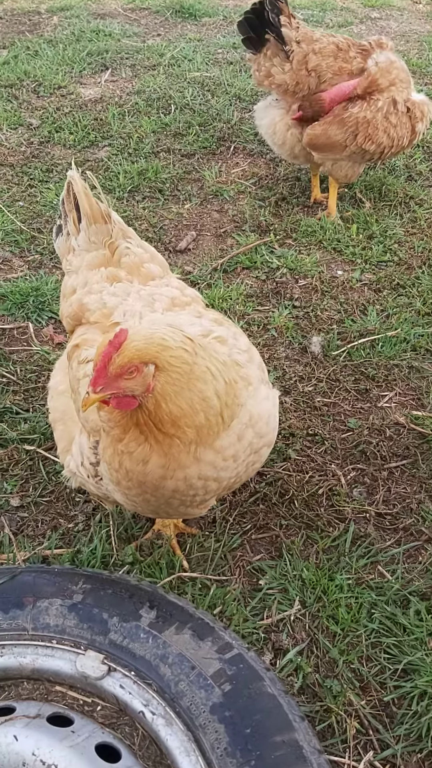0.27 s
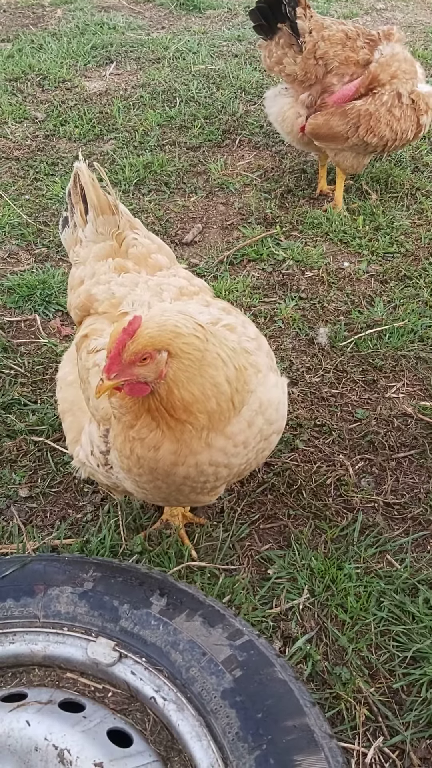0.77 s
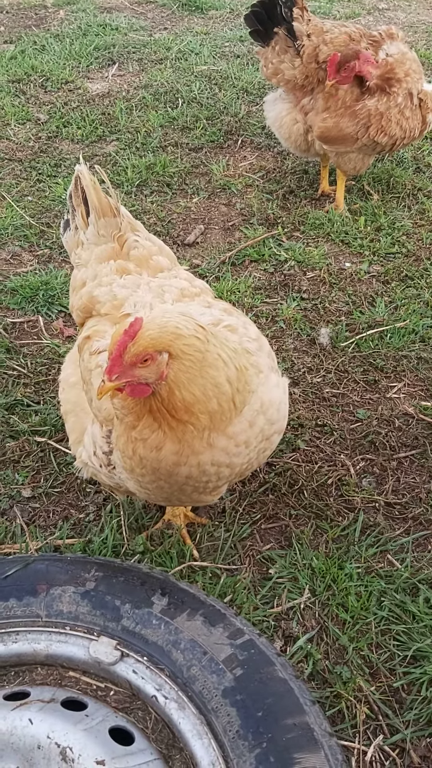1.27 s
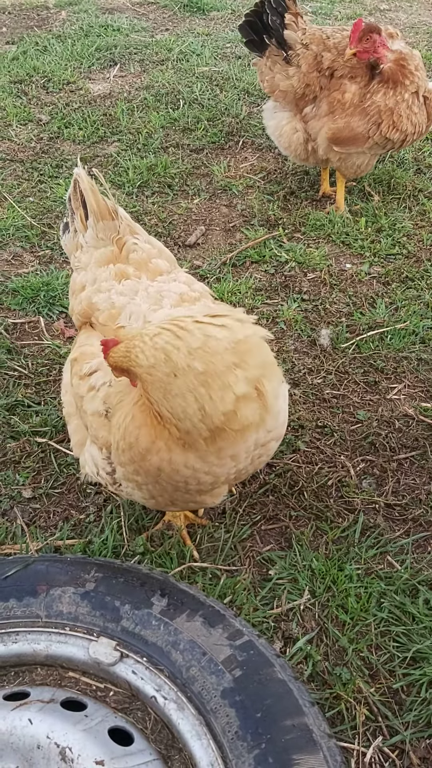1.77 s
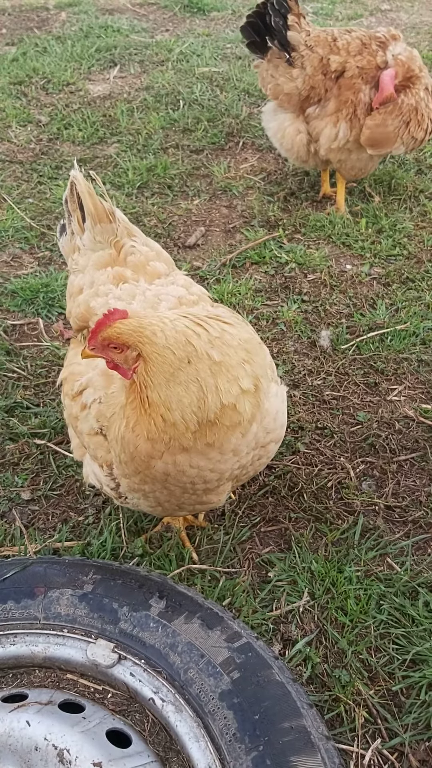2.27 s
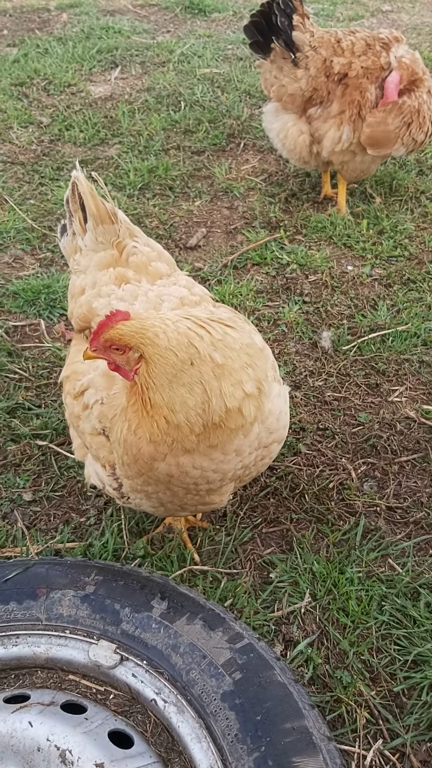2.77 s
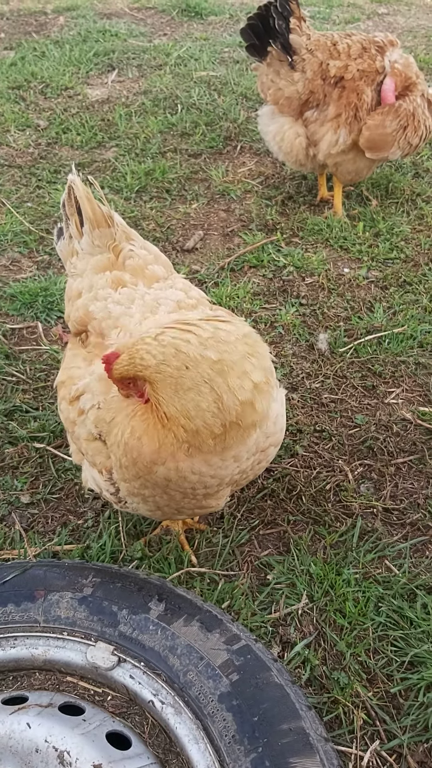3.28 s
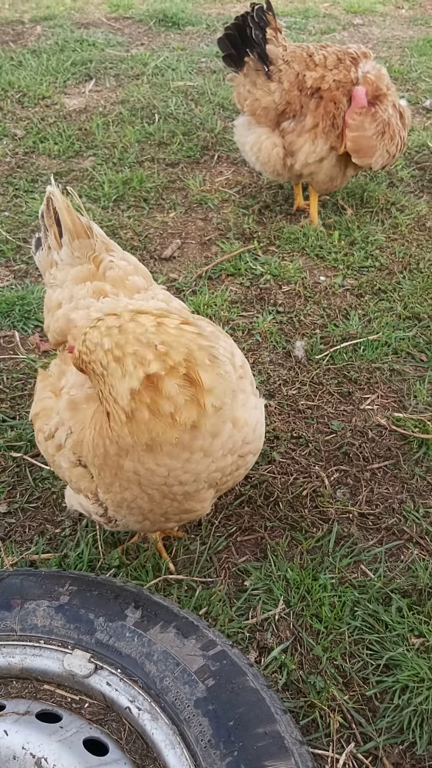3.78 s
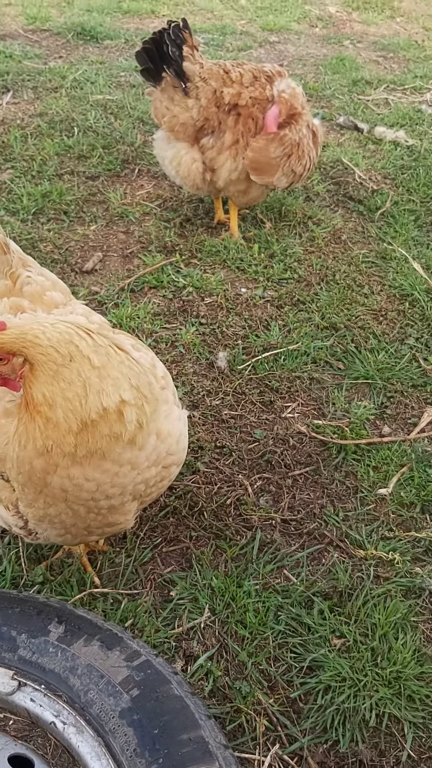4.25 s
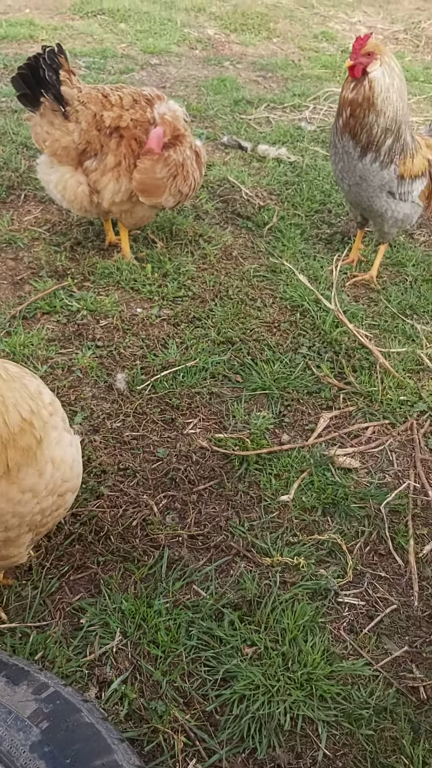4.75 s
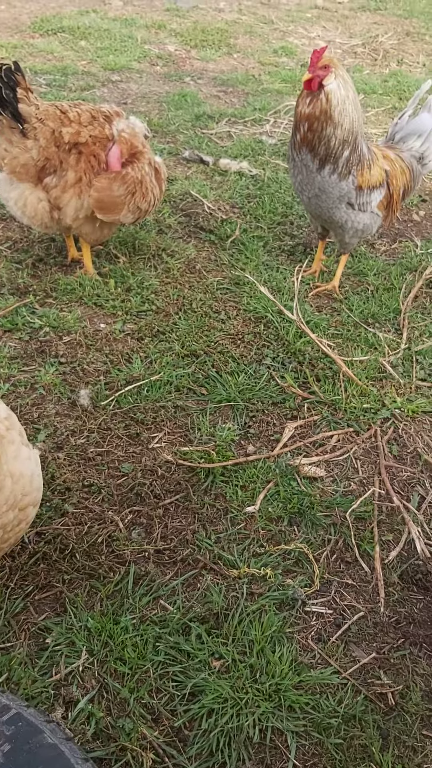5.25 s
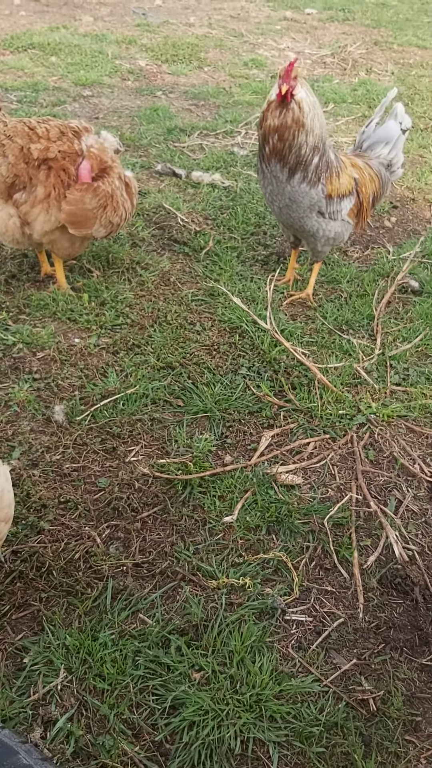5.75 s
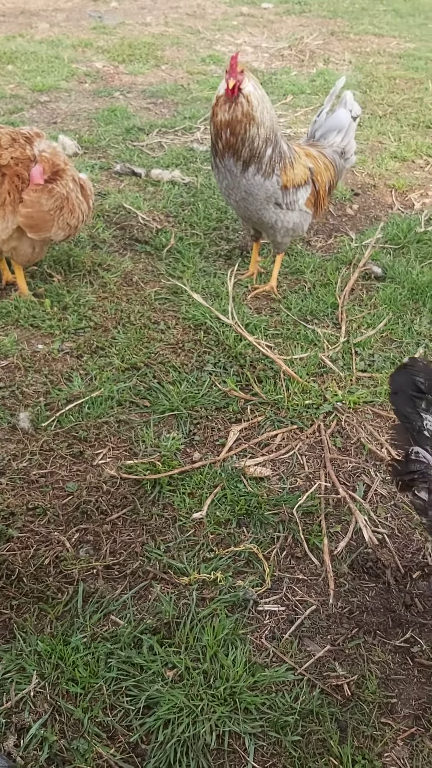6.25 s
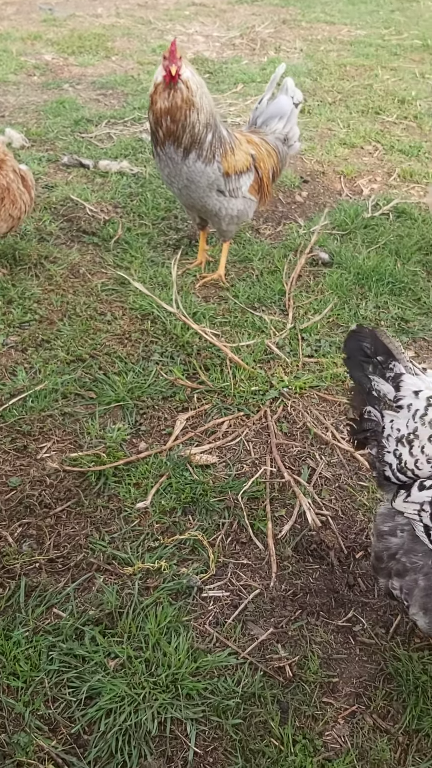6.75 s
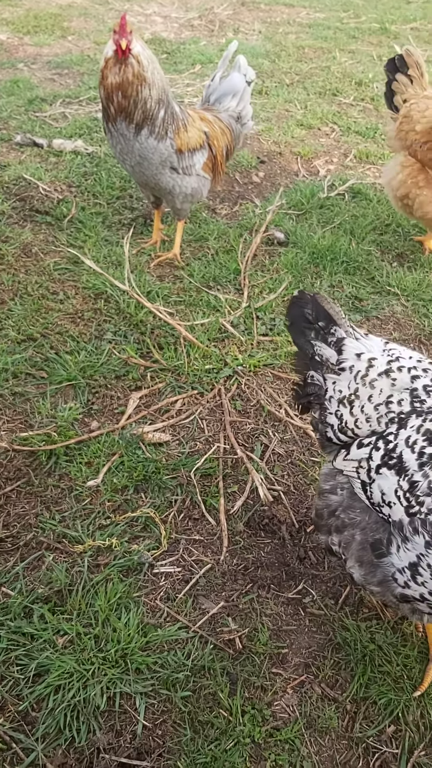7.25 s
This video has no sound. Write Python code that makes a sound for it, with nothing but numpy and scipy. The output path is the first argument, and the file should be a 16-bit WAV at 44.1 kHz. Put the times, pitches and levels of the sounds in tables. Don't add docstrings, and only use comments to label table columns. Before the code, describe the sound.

A close hen gives two quavering, even-pitched calls in an open field, the second introduced by a low growl and a brief crack. Small birds whistle faintly far away between them, and low wind flutters. Afterwards there is no more calling, only hissing finger strokes, crisp ticks and hollow pops against a handheld stereo microphone, strongest at the right, with a few tiny squeaks.

```python
import sys
import numpy as np
from scipy import signal
from scipy.io import wavfile
from scipy.ndimage import uniform_filter1d

SR = 44100
rng = np.random.default_rng(int(sys.argv[2]) if len(sys.argv) > 2 else 0)


def to_wav(s):
    ch = np.atleast_2d(s).T
    pcm = np.round(np.clip(ch, -1, 1) * 32767)
    wavfile.write(sys.argv[1], SR, pcm.astype(np.int16))


def invert_db(level):
    return 10 ** (np.asarray(level, dtype=float) / 20)


N = 331632

# start_s, peak_s, start_db, peak_db, pitch_hz
FIRST_CALL = [(0.0, 0.026, -45.5, -38, 448.5), (0.046, 0.068, -39.5, -37, 454.5),
              (0.096, 0.116, -38, -38.5, 447), (0.142, 0.17, -40.5, -42.5, 613.4),
              (0.187, 0.198, -40, -36, 465), (0.208, 0.223, -39, -35.5, 458),
              (0.235, 0.263, -38, -36.5, 448.7), (0.286, 0.301, -39, -34, 465.4),
              (0.321, 0.345, -39, -35.5, 475.5), (0.365, 0.382, -37, -34, 448.5),
              (0.396, 0.419, -39.5, -32, 457), (0.439, 0.47, -41, -32, 458.5),
              (0.493, 0.527, -39.5, -33.5, 448.2), (0.553, 0.567, -38, -35, 436.7),
              (0.596, 0.614, -52, -80, 429)]
# start_s, peak_s, start_db, peak_db, pitch_hz
GROWL = [
    (2.33, 2.346, -62, -60.5, 443.5),
    (2.392, 2.412, -80, -48, 451.4),
    (2.445, 2.495, -87, -46, 465.7),
    (2.535, 2.568, -56, -42.5, 473),
    (2.612, 2.652, -58.5, -44, 478.5),
    (2.69, 2.71, -51, -48, 530),
    (2.727, 2.748, -47, -45.5, 557.3),
    (2.762, 2.775, -56, -42, 497),
    (2.79, 2.8, -55, -46, 491),
]
# start_s, peak_s, start_db, peak_db, pitch_hz
RISE = [
    (2.818, 2.82, -50, -39, 464),
    (2.84, 2.82, -44, -37, 492),
    (2.858, 2.83, -47, -39, 460),
    (2.9, 2.91, -40, -36, 479),
    (2.91, 2.92, -41.5, -38, 455),
    (2.944, 2.97, -41, -36.5, 467),
    (2.978, 2.989, -51, -37.5, 471),
    (2.991, 2.985, -47.5, -38, 443.6),
    (3.015, 3.025, -44, -31, 462),
]
# start_s, peak_s, start_db, peak_db, pitch_hz
CATCH = [
    (3.04, 3.052, -49, -70, 455.6),
    (3.058, 3.07, -79.5, -67.5, 760),
    (3.076, 3.081, -61, -53, 725),
    (3.091, 3.097, -52, -50, 674.7),
    (3.102, 3.108, -51, -50.5, 635.4),
]
# start_s, peak_s, start_db, peak_db, pitch_hz
LONG_CALL = [(3.117, 3.144, -44, -31.5, 473.2), (3.188, 3.196, -39.5, -30.0, 482.7),
             (3.216, 3.257, -45, -29.5, 474.5), (3.283, 3.306, -53, -29, 481.6),
             (3.333, 3.349, -32, -31, 474), (3.388, 3.419, -39, -30.5, 459.6),
             (3.448, 3.471, -42, -29, 466.7), (3.499, 3.529, -37, -28.5, 470.8),
             (3.561, 3.567, -37.5, -36, 467), (3.572, 3.596, -39, -28, 465),
             (3.606, 3.644, -37, -26.5, 470), (3.662, 3.68, -37.5, -28.5, 476),
             (3.719, 3.738, -41, -26, 468), (3.764, 3.811, -52, -29.0, 459.6),
             (3.834, 3.851, -37.5, -31.5, 472), (3.865, 3.881, -45, -30.5, 467.4),
             (3.891, 3.919, -35.5, -26.5, 469), (3.938, 3.954, -35, -28, 470.2),
             (3.963, 3.984, -33.5, -29.5, 460.8), (4.004, 4.015, -39.5, -31, 453.7),
             (4.025, 4.041, -37.5, -32.5, 440), (4.048, 4.063, -37, -29.5, 460.5),
             (4.091, 4.12, -44, -27.5, 469.5), (4.122, 4.13, -35, -33.5, 468.6),
             (4.139, 4.175, -58.5, -34, 473.3), (4.173, 4.202, -45.5, -34.5, 469.4),
             (4.212, 4.221, -35, -28, 473.8), (4.242, 4.279, -69, -38.0, 470),
             (4.287, 4.314, -70.0, -99, 468)]
# time_s, half_pitch_db, brightness_db_per_octave
FIRST_VOICE = [
    (0, -30, 10),
    (.135, -11.5, 5.5),
    (0.147, 4, -2),
    (.18, 7, 24),
    (.195, -8.5, 8),
    (0.301, -21, 3.5),
    (.47, -34, 5),
]
# time_s, half_pitch_db, brightness_db_per_octave
GROWL_VOICE = [
    (2.3, 1, 3.5),
    (2.75, -2.5, 21),
    (2.79, -6.5, -8),
    (2.86, -9, -4),
    (2.99, -27.5, -4),
    (3.03, -8, 4),
    (3.11, 9.5, 4),
]
# time_s, half_pitch_db, brightness_db_per_octave
LONG_VOICE = [
    (3.13, -12, -4.5),
    (3.349, -42.5, -8.5),
    (3.42, -12.5, -0.5),
    (3.54, -14, -0.5),
    (3.62, -32, -5.5),
    (3.76, -46, -6.5),
    (3.81, -13.5, 0),
    (3.95, -26, -9.5),
    (4.2, -13.5, 1),
]
# time_s, level_db
RASP = [
    (3.38, -11),
    (3.42, -1.5),
    (3.47, 4),
    (3.54, 4),
    (3.6, 2.5),
    (3.64, -8),
    (4.18, -13),
    (4.22, -3),
]
# time_s, shift_hz
FLICKS = [(0.007, 14), (0.021, 14.5), (0.049, 14), (0.06, 35.5), (0.08, -21.5), (0.096, -14),
          (0.116, -20.5), (0.122, 30.5), (0.127, -9.5), (0.212, 19.5), (0.23, -14), (0.234, 27.5),
          (0.252, 14), (0.268, 10), (0.279, -17.5), (0.294, 18), (0.315, -25), (0.322, 55),
          (0.334, -24), (0.339, 34.5), (0.351, -22.5), (0.373, 35.5), (0.414, 23.5), (0.436, -26.5),
          (0.44, 53), (0.46, 17), (0.474, 11.5), (0.484, -36), (0.499, 18), (0.53, 28.5),
          (0.567, 24.5), (0.578, -30),
          (2.862, 33), (2.877, 10.5), (2.914, -14), (2.928, 18), (2.948, 21.5), (2.962, -33.5),
               (2.981, 27), (3.013, -19.5), (3.029, -23.5), (3.155, -11.5), (3.174, 22.5), (3.2, 17.5),
               (3.209, -26), (3.224, 48), (3.243, -13), (3.253, 11), (3.265, -26.5), (3.314, -20.5),
               (3.323, -12.5), (3.36, -26), (3.365, 24), (3.402, -23.5), (3.418, -12), (3.438, 42.5),
               (3.452, 28.5), (3.468, -21), (3.507, 15.5), (3.562, 18), (3.569, -28.5), (3.587, 22.5),
               (3.604, -30.5), (3.657, -16.5), (3.673, 29), (3.684, -21.5), (3.723, -19.5), (3.73, 18.5),
               (3.757, -33.5), (3.789, -26), (3.838, 19.5), (3.849, 18.5), (3.877, 13.5), (3.895, 17),
               (3.946, 16), (3.978, -12), (3.984, 21), (4.004, -26.5), (4.012, 10.5), (4.063, 20),
               (4.094, -43), (4.112, 18.5), (4.126, -45.5), (4.133, 26.5), (4.161, -36), (4.167, 32),
               (4.182, -58), (4.229, -18.5), (4.271, -17)]
# freq_hz, gain_db
THROAT = [(200, -8.5), (460, 1), (700, -6), (930, -9), (1160, 0), (1400, -15), (1850, -29.5), (2100, -51.5),
          (2350, -26), (2800, -47), (3500, -36), (4200, -43), (4800, -61.5)]
# freq_hz, gain_db
HEAD_TURNED = [(460, 0), (930, 4), (1400, -7), (1850, 1), (2200, 0), (4000, -8)]
# freq_hz, left_minus_right_db
HEN_BALANCE = [(60, -2.5), (180, -5), (550, 0), (1650, -7.5), (4970, 4.5), (15000, -9)]

# time_s, crack_db
TICKS = [(0.462, -51.5), (2.36, -64), (4.784, -43), (4.8154, -45), (4.474, -49), (5.38, -52.5),
         (5.4257, -56), (5.703, -38.5), (5.764, -52), (5.878, -34), (5.7948, -21), (6.3948, -19.5),
         (6.396, -21), (6.398, -32), (6.5276, -41), (6.6746, -45), (6.9623, -43)]
# time_s, crack_db, thump_db
POPS = [(4.294, -46, -42), (4.4112, -52, -41), (6.038, -40, -41), (4.746, -72, -39), (4.872, -55, -37),
        (4.904, -57, -41), (5.654, -53, -34), (5.8204, -32, -28), (5.841, -43, -59), (6.1094, -39.5, -34),
        (6.1405, -41.5, -28), (6.157, -38, -26.5), (6.1647, -36.5, -27), (6.1942, -28.5, -26.5),
        (6.1976, -31.5, -32), (6.1989, -42.5, -24.5), (6.222, -32, -28), (6.229, -33, -24.5),
        (6.405, -40, -37), (6.432, -34.5, -36), (6.7579, -41, -34.5), (6.896, -38.5, -34),
        (6.8984, -41, -38), (6.9065, -25.5, -21), (6.919, -42, -38), (6.926, -29.5, -24.5),
        (6.9371, -38.5, -34), (6.9489, -26.5, -23.5), (7.0157, -42, -40), (7.2563, -32.5, -27.5)]
# time_s, crack_db, thump_db, tear_lead_s
TEARS = [
    (6.2522, -21, -26, 0.0024),
    (6.4205, -28.5, -23.5, 0.00414),
    (6.5333, -20.5, -25.5, 0.00295),
    (6.6051, -22, -21, .0023),
    (6.638, -23.5, -23, 0.0033),
    (6.659, -29, -23.5, 0.0042),
    (6.7175, -26, -22, .0055),
    (7.0487, -25, -22.5, 0.0027),
    (7.1005, -27, -22.5, .0041),
    (7.2979, -30, -22, 0.0051),
]
SOFT_PADS_S = [6.038, 6.1094, 6.1403, 6.4324, 6.7578, 7.0155]
# peak_s, rise_s, fall_s, hiss_db, bright_db, dull_db
STROKES = [(.08, 0.97, 0.34, -74, -9, 0.5), (.34, 1, 0.13, -72.5, -2.5, 5),
           (3.58, 0.64, 0.52, -80.5, 1, 2.5), (3.85, 0.16, 0.28, -67, -0.5, 3),
           (4.23, 0.05, 0.19, -61, -7.5, 1), (4.55, 0.2, 0.27, -57, -10, -1),
           (4.8, 0.152, 1, -82.5, -10, -5), (5.67, 0.044, 0.44, -60.5, -2, 2),
           (5.839, 0.071, 0.26, -50, -9.5, -1.5), (5.94, 0.11, 0.48, -55, -7, -3.5),
           (6.18, 1, 0.35, -76.5, 0, -3), (6.7, 0.58, 0.14, -70, -1, -0.5),
           (6.92, 0.031, 0.29, -68, -15, -1.5), (7.14, 0.25, 0.24, -74, 5.5, -5.5),
           (7.3, 0.043, 0.21, -58.5, -2.5, 0.5), (7.442, 0.041, 0.058, -51.5, -1, 0)]
# start_s, peak_s, end_s, level_db
LEFT_STROKES = [
    (3.58, 3.62, 3.66, -78),
    (3.6, 3.72, 3.84, -79),
    (3.72, 3.88, 4.0, -71),
    (4.18, 4.24, 4.33, -80),
    (5.8, 5.93, 6.12, -80),
]
# freq_hz, density_db_per_hz
SKIN = [(60, 22.5), (150, 0.5), (300, 6), (700, 2), (1600, -2.5), (3700, -5.5), (5800, -5), (8000, -21),
        (11000, -21.5), (16800, 4.5)]
LEFT_SKIN = [(3000, -12), (4500, 3.5), (6800, 0.5), (9000, -16), (13000, -11), (15800, -5)]
# peak_s, half_length_s, centre_hz, level_db, left_minus_right_db
HOLLOWS = [
    (.23, 0.21, 13000, -68, -14),
    (.2, 0.22, 4500, -68.5, -11),
    (0.032, 0.044, 4500, -71, -9),
    (3.85, .3, 13800, -76, -10),
    (5.94, .14, 3400, -51.5, -30),
    (6.8, 0.11, 4900, -74, -33),
    (7.203, .09, 5200, -74, -30),
    (7.451, 0.05, 5400, -60.5, -33),
    (7.51, .012, 5200, -66, -30),
]

# start_s, start_hz, level_db
WHISTLES = [(.872, 4280, -82), (1.012, 4200, -87), (1.66, 4940, -80), (1.765, 4900, -80),
            (1.905, 3560, -80), (2.02, 3600, -86), (2.178, 4880, -74), (2.295, 4870, -74.5),
            (2.415, 3610, -71.5), (2.53, 3620, -79), (2.672, 4947, -69.5), (2.695, 3600, -78),
            (2.785, 4920, -78.5), (6.675, 5050, -74), (6.79, 4930, -74), (6.54, 3580, -75),
            (7.185, 4900, -75), (6.775, 5000, -82)]
# start_s, length_s, start_hz, end_hz, level_db
SQUEAKS = [
    (.665, 0.095, 2890, 2640, -72),
    (3.2, 0.05, 3110, 2360, -73.5),
    (5.419, 0.012, 1480, 1270, -52.5),
    (6.452, 0.036, 1520, 1250, -55),
    (7.37, 0.072, 1560, 1710, -53.5),
    (7.42, 0.097, 1307, 1194, -61),
    (7.43, 0.062, 2100, 2230, -58),
]

# time_s, level_db
GUSTS = [(0, -53.5), (.3, -56.5), (.6, -49.5), (.85, -60), (1.1, -51), (1.7, -58), (2.2, -58.5), (2.9, -50),
         (3.5, -46), (3.8, -50), (4.55, -46), (4.85, -47.5), (5.3, -56), (5.6, -42.5), (6.1, -55),
         (6.5, -54.5), (7.2, -52.5), (7.51, -54)]
# peak_s, rise_s, fall_s, level_db
BUFFETS = [
    (.45, 2.7, 0.61, -42.5),
    (2.6, 1.2, 0.5, -45),
    (3.5, 0.53, 0.77, -42.5),
    (4.3, 0.98, 0.65, -53),
    (4.8, 0.66, 0.18, -43.5),
    (5.3, 0.42, 1, -37.5),
    (5.65, 0.53, 0.93, -46.5),
    (3.95, 0.11, 0.16, -40),
    (7.2, 0.39, 1, -52),
]
# freq_hz, density_db_per_hz
RUMBLE = [(15, -34), (25, -3), (59, -2.5), (95, -3.5), (119, -7.5), (180, -17.5), (230, -52.5), (400, -120)]
FLUTTER = [(100, -40.5), (170, -25), (270, 19.5), (376, -13), (421, 0.5), (700, -51), (910, -56.5),
           (1540, -120)]
# freq_hz, density_db_per_hz
AIR = [(260, -51.5), (450, -4), (646, -17.5), (1480, -5), (1940, -26), (4190, -26), (6100, -30.5),
       (8500, -31), (15100, -24), (16500, -36)]
# freq_hz, left_minus_right_db
AIR_BALANCE = [(60, -2.0), (240, -0.5), (950, -5.5), (3770, 7.5), (15000, -1.5)]
# freq_hz, share
LIKENESS = [(60, 1), (380, 0.69), (2380, 0.0008), (15000, 0.032)]

SAG_SHARE, SAG_FROM_DB = 0.0049, -45
BREAK_HZ = 500
FLICK_S, FLICK_SHARE = 0.0033, 1.1
ROUNDNESS = 1.5
ROUGH_LOUD, ROUGH_SOFT, ROUGH_PER_DB = .115, .165, .011
UNEVEN_FROM_DB, UNEVEN_ROUGH = -9, .005
UNEVEN_SECOND_DB, UNEVEN_TOP_DB = -0.57, -0.5
OPEN_FROM_DB, OPEN_PER_DB = -37, 1.3
BREATH_DB = -33
TICK_THUMP_DB = -3.5
TEAR_CRACK_DB, TEAR_THUMP_DB = -5, -13
BRIGHT_PER_DB = 0.32
PAD_SOFT, SNAP, SPARK_QUICK = 0.86, 1.1, 2.2
RESTING_DB, RESTING_BRIGHT_DB = -88, -84
DULL_PER_DB, DULL_DB = -0.0341, -1
HOLLOW_WIDTH = 0.14
HIGH_WHISTLE_S, LOW_WHISTLE_S = .078, .115
FIELD_T60_S, FIELD_DB = .6, -7
FLUTTER_FOLLOWS, FLUTTER_DB = 0.29, -56
RIGHT_LEAN = -0.37
AIR_DB = -74.5
LIMIT, LOW_CUT_HZ, TOP_CUT_HZ = .36, 38, 15900


def rms_one(x):
    return x / np.sqrt(np.mean(x ** 2) + 1e-20)


def in_time(rows):
    s, *columns = np.transpose(rows)
    return [np.interp(np.arange(N) / SR, s, c) for c in columns]


def at_hz(points, hz):
    freq_hz, db = np.transpose(points)
    return np.interp(np.log(hz), np.log(freq_hz), db)


def drift(rate, size=N):
    r = np.exp(-64 * np.pi * rate / SR)
    chance = rng.standard_normal(size // 32 + 1002)
    slow = signal.lfilter([1], [1, -2 * r, r * r], chance)[1000:]
    return np.interp(np.arange(size) / 32, np.arange(len(slow)), rms_one(slow))


def ring(x, hz, t60_s):
    r, w = invert_db(-60 / (t60_s * SR)), 2 * np.pi * hz / SR
    return signal.lfilter([np.sin(w)], [1, -2 * r * np.cos(w), r * r], x + 1e-18)


def pan(db):
    left = invert_db(db) / (1 + invert_db(db))
    return 2 * np.array([left, 1 - left])


def swells(rows, floor_db):
    t = np.arange(0, N, 64) / SR
    total = invert_db(floor_db)
    for s, rise, fall, db in rows:
        total = total + invert_db(db - 20 * np.where(t < s, (s - t) / rise, (t - s) / fall))
    return np.interp(np.arange(N) / SR, t, 20 * np.log10(total))


def banded_noise(spectrum, patchy_db, rate, alike, shaping):
    low_hz, high_hz = spectrum[0][0], spectrum[-1][0]
    edges = np.geomspace(low_hz, high_hz, round(2 * np.log2(high_hz / low_hz)) + 1)
    centres = np.sqrt(edges[1:] * edges[:-1])
    total = np.sqrt(np.sum(invert_db(2 * at_hz(spectrum, centres)) * np.diff(edges)) * 2 / SR)
    out, together, white = 0, drift(rate), rng.standard_normal((2, 2, N))
    for k, hz in enumerate(centres):
        band = signal.butter(2, edges[k:k + 2], "band", fs=SR, output="sos")
        mid, side = signal.sosfilt(band, white[k % 2])
        share = np.clip(alike * at_hz(LIKENESS, hz), 0, .99)
        flicker_db = patchy_db * (together + 0.71 * drift(rate))
        gain = invert_db(at_hz(spectrum, hz) + flicker_db) / total
        stereo = np.sqrt(1 + share) * mid + np.sqrt(1 - share) * side * [[1], [-1]]
        out = out + gain * shaping(hz) * stereo / np.sqrt(1 + share)
    return out


def hen(throbs, voice, turned):
    start, peak, start_db, peak_db, mean_hz = np.transpose(throbs)
    first, last = round(start[0] * SR), round(peak[-1] * SR)
    t = np.arange(first, last) / SR
    level_db = breath_db(t, start, peak, start_db, peak_db)
    sag = SAG_SHARE * np.clip((peak_db - SAG_FROM_DB) / 10, 0, 1) * (mean_hz < BREAK_HZ)
    pitch = pitch_of(t, start, peak, mean_hz * (1 + sag), mean_hz * (1 - sag)) + flicks(t)

    half_db, bright = [c[first:last] for c in in_time(voice)]
    rasp_db = in_time(RASP)[0][first:last]
    uneven = np.clip(half_db - UNEVEN_FROM_DB, 0, 10)
    rough = ROUGH_LOUD - ROUGH_PER_DB * (level_db - level_db.max() + 7)
    rough = np.clip(rough, ROUGH_LOUD, ROUGH_SOFT) + UNEVEN_ROUGH * uneven
    jitter = 1 + rough * 0.15 * drift(70, size=len(t))
    phase = np.pi * np.cumsum(pitch * jitter) / SR
    push_db = np.clip(1.7 * (level_db + 33), -14, 7)

    out = np.zeros((2, N))
    for k in range(1, 21):
        hz = k * pitch / 2
        octaves = np.log2(max(k / 4, 1))
        db = level_db + 0.5 + at_hz(THROAT, hz) + turned * at_hz(HEAD_TURNED, hz)
        db += push_db * octaves ** .5 + bright * octaves + half_db * (k % 2)
        db += (k > 7) * np.clip(OPEN_PER_DB * (level_db - OPEN_FROM_DB), -16, 0) + (k > 11) * rasp_db
        db += uneven * ((k == 4) * UNEVEN_SECOND_DB + (k > 6) * UNEVEN_TOP_DB)
        shimmer = 1 + rough * min(.75 * k - .6, 5 + 3 * (k > 11)) * drift(130, size=len(t))
        lag = -.03 * k * k - 0.21 * k * np.array([[1], [0]])
        out[:, first:last] += invert_db(db) * shimmer * pan(at_hz(HEN_BALANCE, hz)) * np.cos(k * phase + lag)

    band = signal.butter(6, [800, 1700], "band", fs=SR, output="sos")
    breath = rms_one(signal.sosfilt(band, rng.standard_normal(len(t)))) * (1 + np.cos(2 * phase))
    out[:, first:last] += invert_db(level_db + BREATH_DB + push_db / 2) * breath * pan(-2.5)[:, None]
    return out


def breath_db(t, start, peak, start_db, peak_db):
    knots = np.ravel([start, peak], "F")
    levels = invert_db(np.ravel([start_db, peak_db - 0.5], "F"))
    straight = np.interp(t, knots, levels)
    full = np.interp(t, knots, levels ** ROUNDNESS) ** (1 / ROUNDNESS)
    swell = np.where(np.gradient(straight) < 0, full, straight)
    return uniform_filter1d(20 * np.log10(swell), size=130)


def pitch_of(t, start, peak, rising, falling):
    before = (start + 2 * peak) / 3
    after = (np.append(start[1:], peak[-1]) + 2 * peak) / 3
    earlier = np.append(rising[0], falling[:-1])
    knots = [start - .003, start + .003, before, after]
    values = [.997 * earlier, 1.002 * rising, rising, falling]
    return np.interp(t, np.ravel(knots, "F"), np.ravel(values, "F"))


def flicks(t):
    return sum(FLICK_SHARE * hz * np.exp(-.5 * ((t - s) / FLICK_S) ** 2) for s, hz in FLICKS)


def clicks():
    grit, spark, push = np.zeros((3, N))
    size = 160
    fade = np.exp(-np.arange(size) / 40.0)
    for s, crack_db, thump_db, soft in releases():
        at = round(s * SR) - 14
        chance = rng.standard_normal(size)
        snap = SNAP * np.clip((thump_db - crack_db + 6) / 6, 0, 1) * (np.arange(size) < 3)
        crackle = signal.lfilter([1], [1, -np.clip(soft, 0, .95)], (chance + snap) * fade)
        grit[at:at + size] += invert_db(crack_db) * rms_one(crackle)
        spark_db = crack_db + BRIGHT_PER_DB * (crack_db + 34.5)
        spark[at:at + size] += invert_db(spark_db) * rms_one(chance * fade ** SPARK_QUICK) * (1 - soft)
        push[at] += invert_db(thump_db)
    low = signal.cheby2(4, 30, 7600, fs=SR, output="sos")
    high = signal.butter(4, 11500, "high", fs=SR, output="sos")
    dull = signal.sosfilt(low, signal.lfilter([1, -1], [1, -.86], grit))
    crack = invert_db(-3.0) * dull + invert_db(-14.5) * ring(dull, 1830, 0.0013)
    crack += invert_db(-15.0) * signal.sosfilt(high, spark) + invert_db(-28.5) * spark
    puff = signal.lfilter([.15], [1, -.85], push)
    thump = invert_db(-2.5) * ring(puff, 545, 0.013) - invert_db(2.5) * ring(np.roll(puff, 24), 301.6, 0.021)
    through_body = invert_db(-17) * (ring(np.roll(puff, 22), 520, 0.016) - ring(np.roll(puff, 52), 400, 0.014))
    return np.array([through_body, crack + thump])


def releases():
    ticks = [(s, db, db + TICK_THUMP_DB) for s, db in TICKS]
    tears = [(s - lead, crack + TEAR_CRACK_DB, thump + TEAR_THUMP_DB) for s, crack, thump, lead in TEARS]
    rows = ticks + POPS + [row[:-1] for row in TEARS] + tears
    pads_s = np.array(SOFT_PADS_S)
    return [(*row, PAD_SOFT * (np.abs(row[0] - pads_s).min() < .003)) for row in rows]


def fingers():
    hiss_db = swells([row[:-2] for row in STROKES], RESTING_DB)
    bright_rows = [(s, rise, fall, db + bright) for s, rise, fall, db, bright, dull in STROKES]
    dull_rows = [(s, rise, fall, db + dull) for s, rise, fall, db, bright, dull in STROKES]
    bright_db = swells(bright_rows, RESTING_BRIGHT_DB)
    dull_db = swells(dull_rows, RESTING_DB) + DULL_DB + DULL_PER_DB * (hiss_db + 74.5)

    def right_gains(hz):
        if hz < 2600:
            return pan(-19)[:, None] * invert_db(dull_db + 6.0)
        return pan(-36)[:, None] * invert_db(hiss_db + 2.0 if hz < 8000 else bright_db + 3.0)

    right = banded_noise(SKIN, patchy_db=.8, rate=25, alike=.3, shaping=right_gains) * invert_db(1.5 * drift(60))
    deaf = signal.butter(1, [6200, 8600], "bandstop", fs=SR, output="sos")
    pressure = np.zeros(N)
    for start, peak, end, db in LEFT_STROKES:
        pressure += np.interp(np.arange(N) / SR, (start, peak, end), (0, invert_db(db), 0))
    left_gains = pressure * pan(12)[:, None]
    left = banded_noise(LEFT_SKIN, patchy_db=.8, rate=25, alike=.1, shaping=lambda hz: left_gains)
    return .8 * signal.sosfilt(deaf, right) + .2 * right + left


def hollows():
    out = np.zeros((2, N + SR))
    for s, half, hz, db, pan_db in HOLLOWS:
        edges = np.clip([hz * (1 - HOLLOW_WIDTH), hz * (1 + HOLLOW_WIDTH)], 100, .45 * SR)
        size, at = round(2 * half * SR), max(round((s - half) * SR), 0)
        band = signal.butter(2, edges, "band", fs=SR, output="sos")
        noise = signal.sosfilt(band, rng.standard_normal((2, SR)))[:, :size]
        out[:, at:at + size] += invert_db(db) * rms_one(noise) * np.hanning(size) * pan(pan_db)[:, None]
    return out[:, :N]


def birds():
    high_rows = [(s, HIGH_WHISTLE_S, hz, .967 * hz, db) for s, hz, db in WHISTLES if hz > 4000]
    low_rows = [(s, LOW_WHISTLE_S, hz, .985 * hz, db) for s, hz, db in WHISTLES if hz <= 4000]
    high = gliding_tones(high_rows, 1 + 0.55 * drift(70))
    low = gliding_tones(low_rows, 1 + 0.17 * drift(60))
    direct = high * pan(-4)[:, None] + low * pan(4)[:, None]
    age_s = np.arange(SR // 2) / SR
    field = rng.standard_normal((2, len(age_s))) * invert_db(-60 * age_s / FIELD_T60_S) * (age_s > .015)
    field /= np.sqrt(np.sum(field[0] ** 2))
    echoes = invert_db(FIELD_DB) * signal.fftconvolve(direct, field, axes=1)[:, :N]
    squeaks = gliding_tones(SQUEAKS, drift(260.4)) * pan(-25.0)[:, None]
    return direct + echoes + squeaks


def gliding_tones(rows, blur):
    out = np.zeros(N)
    for s, length, start_hz, end_hz, db in rows:
        size, at = round(length * SR), round(s * SR)
        phase = 2 * np.pi * np.cumsum(np.linspace(start_hz, end_hz, size)) / SR
        out[at:at + size] += invert_db(db + 2.0) * np.sin(phase) * np.hanning(size) ** .75 * blur[at:at + size]
    return out


def wind():
    rumble_db, = in_time(GUSTS)
    flutter_db = swells(BUFFETS, FLUTTER_DB) + FLUTTER_FOLLOWS * (rumble_db - rumble_db.mean())
    rumble_gains = pan(-2.0 + RIGHT_LEAN * np.maximum(rumble_db + 53, 0))
    rumble = banded_noise(RUMBLE, patchy_db=1.5, rate=9.9, alike=0.93, shaping=lambda hz: rumble_gains)
    flutter = banded_noise(FLUTTER, patchy_db=1.2, rate=14, alike=1, shaping=lambda hz: pan(-2.2)[:, None])
    flutter = signal.sosfilt(signal.butter(4, 400, fs=SR, output="sos"), flutter)
    return invert_db(rumble_db) * rumble + invert_db(flutter_db - 8.0) * flutter


def open_air():
    def balance(hz):
        return pan(at_hz(AIR_BALANCE, hz))[:, None]

    return invert_db(AIR_DB - 1.5) * banded_noise(AIR, patchy_db=0.1, rate=9.5, alike=0.38, shaping=balance)


def scene():
    first_call = hen(FIRST_CALL, FIRST_VOICE, turned=True)
    long_call = hen(GROWL + RISE + CATCH + LONG_CALL, GROWL_VOICE + LONG_VOICE, turned=False)
    touch = clicks() + fingers() + hollows()
    return first_call + long_call + touch + birds() + wind() + open_air()


def low_pass(x):
    return signal.sosfilt(signal.butter(12, 16980, fs=SR, output="sos"), x)


def record(dry):
    rounded = LIMIT * np.tanh(dry / LIMIT)
    low_cut = signal.sosfilt(signal.butter(8, LOW_CUT_HZ, "high", fs=SR, output="sos"), rounded)
    mix = signal.sosfilt(signal.cheby2(12, 26, TOP_CUT_HZ, fs=SR, output="sos"), low_cut)
    return low_pass(mix)


dry = scene()
out = record(dry)
to_wav(out)
```